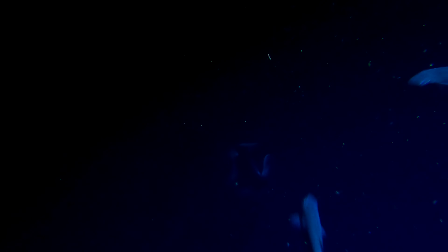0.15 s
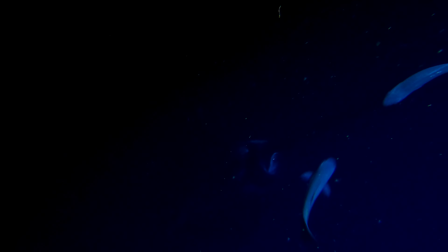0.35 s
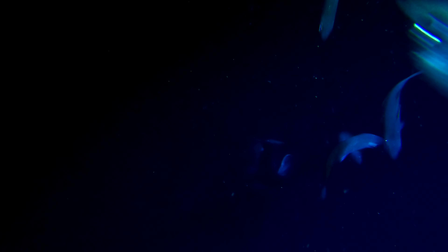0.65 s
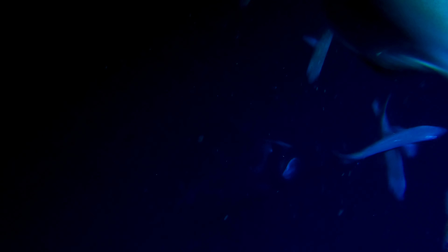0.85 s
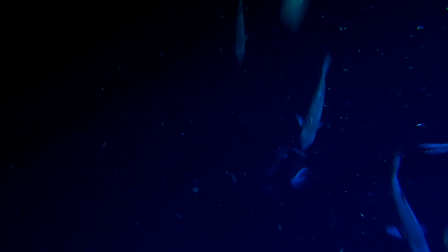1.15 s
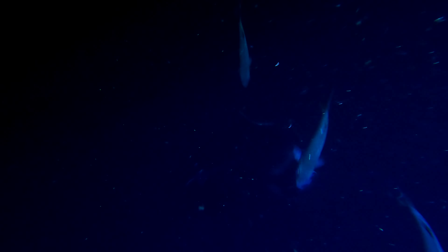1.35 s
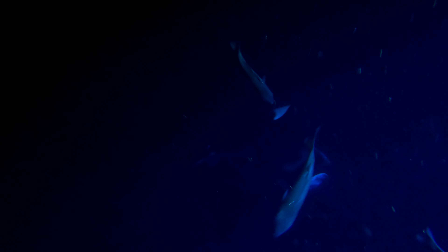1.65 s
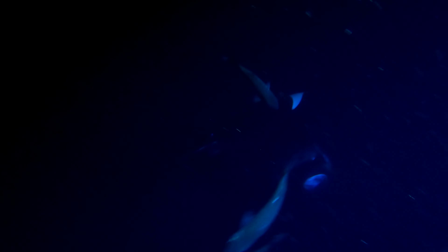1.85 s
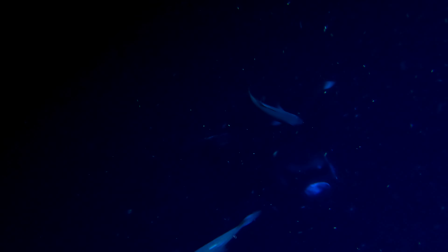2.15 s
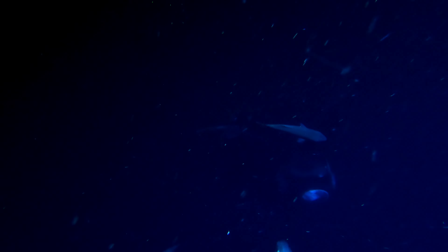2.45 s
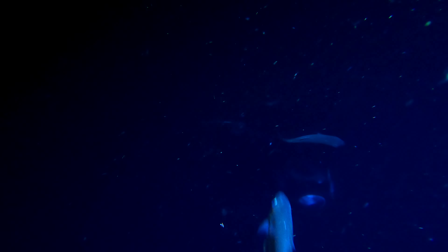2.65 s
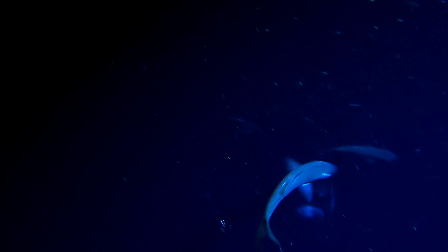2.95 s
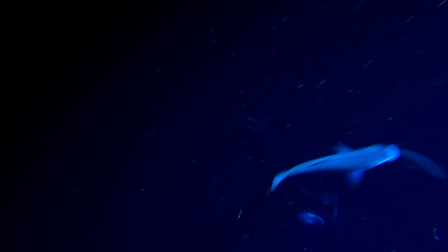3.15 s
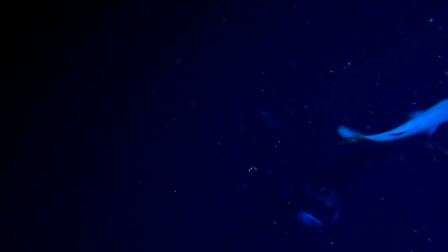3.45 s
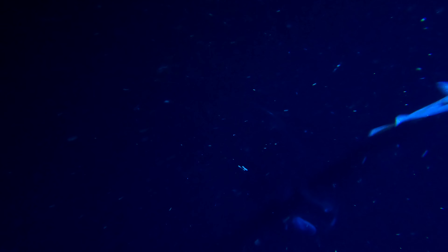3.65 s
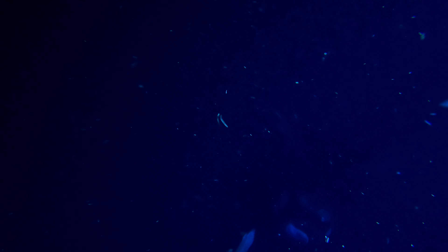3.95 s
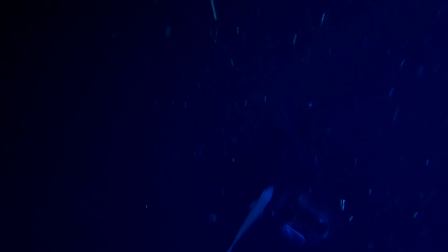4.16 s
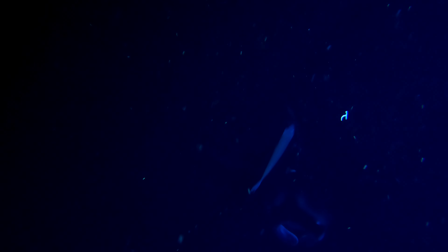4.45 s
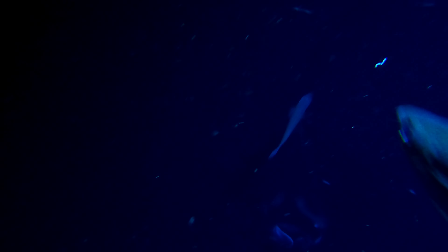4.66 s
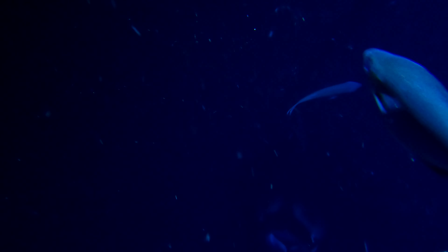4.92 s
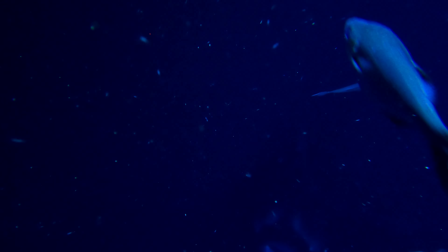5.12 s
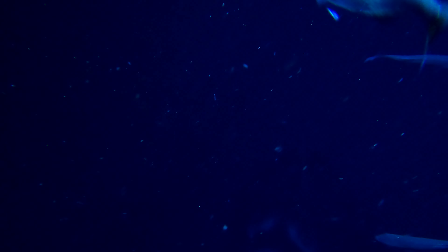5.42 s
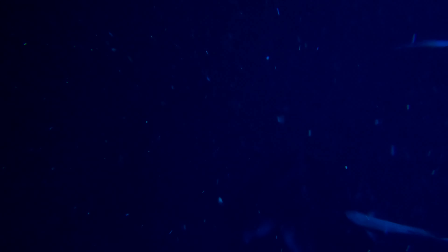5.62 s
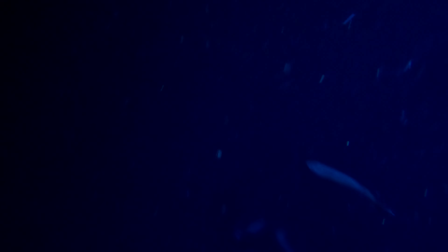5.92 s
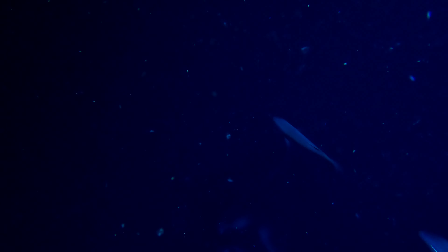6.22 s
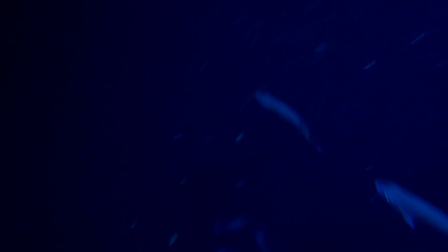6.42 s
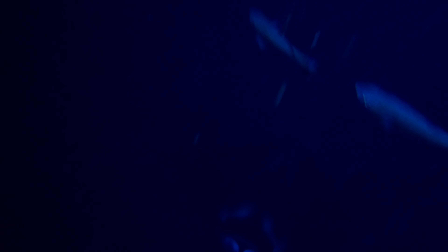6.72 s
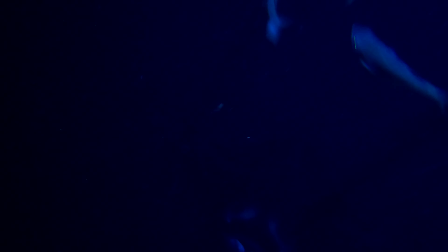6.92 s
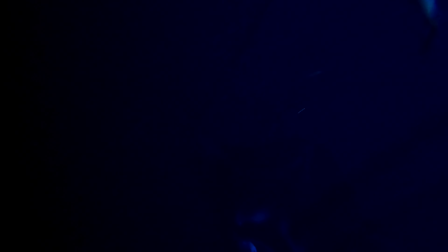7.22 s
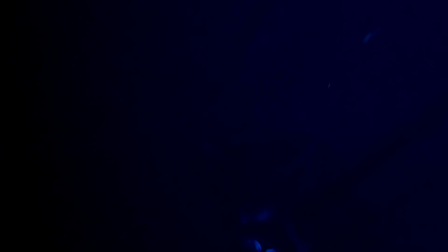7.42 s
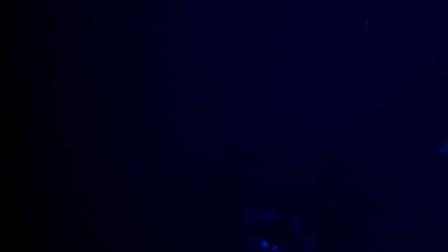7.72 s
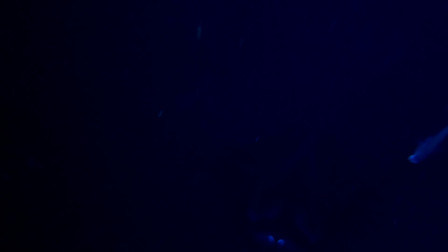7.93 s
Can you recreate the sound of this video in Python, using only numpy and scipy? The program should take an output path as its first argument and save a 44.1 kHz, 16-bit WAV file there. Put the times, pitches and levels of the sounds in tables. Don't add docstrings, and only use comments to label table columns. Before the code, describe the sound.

Muffled engine drone heard beneath the sea, with watery surges, dull knocks and tiny bubble ticks, opening from closed mono to clearer stereo after five seconds.

```python
import sys
import numpy as np
from scipy import signal
from scipy.fft import rfft, irfft, next_fast_len
from scipy.io import wavfile
from scipy.ndimage import uniform_filter1d, map_coordinates

SR = 44100
rng = np.random.default_rng(int(sys.argv[2]) if len(sys.argv) > 2 else 0)


def convert_level_to_amplitude(level_db):
    exponent = np.asarray(level_db, float) / 20
    return 10 ** exponent


def generate_wav(signal):
    frames = np.transpose(np.atleast_2d(signal))
    scaled = np.clip(frames, -1, 1) * 32767
    pcm = np.round(scaled).astype(np.int16)
    wavfile.write(sys.argv[1], SR, pcm)


N = 356328


def unit(x):
    return x / np.sqrt(np.mean(x ** 2) + 1e-20)


def along(points, hz):
    f, *cols = np.transpose(points)
    return [np.interp(np.log(hz + 1), np.log(f + 1), c) for c in cols]


def curves(rows):
    s, *cols = np.transpose(rows)
    return [np.interp(np.arange(N) / SR, s, c) for c in cols]


def wobble(rate):
    coarse = np.arange(0, N + 64, 64)
    knots = rng.standard_normal(int(N * rate / SR) + 4)
    smooth = map_coordinates(knots, [coarse * rate / SR])
    return np.interp(np.arange(N), coarse, smooth)


def filtered(x, response):
    m = next_fast_len(N + 8192)
    return irfft(rfft(x, m) * response(np.fft.rfftfreq(m, 1 / SR)), m)[..., :N]


def above(hz, edge_hz, order=6):
    return hz ** order / (hz ** order + edge_hz ** order)


def bell(hz, centre_hz, width_hz):
    return np.exp(-.5 * ((hz - centre_hz) / width_hz) ** 2)


def humps(modes, hz):
    return convert_level_to_amplitude(sum(db * bell(hz, centre, width) for centre, width, db in modes))


def evened(x, seconds):
    power = np.abs(uniform_filter1d(x ** 2, size=round(seconds * SR)))
    return x / np.sqrt(power + 1e-3 * np.mean(x ** 2))


def swells(rows, calm_db, edge_s):
    t = np.arange(0, N, 64) / SR
    start, length, db = np.transpose(rows)[:, :, None]
    shape = np.clip(np.minimum(t - start, start + length - t) / edge_s + 1, 0, 1)
    swell = np.sum(convert_level_to_amplitude(db) * shape ** 2, axis=0)
    return np.hypot(convert_level_to_amplitude(calm_db), np.interp(np.arange(N) / SR, t, swell))


def churn(patchy_db, strands_db=2.5):
    z = signal.stft(rng.standard_normal(N), nperseg=2048)[2]

    def blurred(bins, frames):
        across = uniform_filter1d(rng.standard_normal(z.shape), size=bins, axis=0)
        return unit(uniform_filter1d(across, size=frames, axis=1))
    gain = convert_level_to_amplitude(patchy_db * blurred(10, 3) + strands_db * blurred(2, 30))
    return unit(signal.istft(z * gain, nperseg=2048)[1][:N])


# (time [s], level [dB], frequency [Hz])
STRONGEST = [(2.55, -40, 159.8), (2.87, -22.5, 159.8), (3.2, -26.5, 159.8), (3.85, -27, 160.5),
             (4.06, -18.5, 162), (4.27, -26, 162.2), (4.42, -23, 162.2), (4.82, -26, 162.2),
             (4.97, -17, 162.8), (5.15, -25.5, 163), (5.45, -27.5, 163), (5.75, -22.5, 163),
             (6.0, -24.5, 163), (6.29, -19.5, 163), (6.65, -25.5, 163), (6.87, -24, 163), (7.1, -27.5, 163),
             (7.95, -20, 163)]
# (multiple of the cycle [-], level over the wash [dB], swing [dB], loudest time [s], period [s])
HUM = [(7, 8.5, 4.5, 5.8, 12), (8, 5.5, -0.6, 7, 12), (12, 6.5, 4.5, 5.3, 7.6), (14, 8.5, 8, 6.9, 12),
       (15, 4.5, 12, 5.25, 10), (16, 5, 2, 1.01, 9), (17, 9, 5.5, 0.77, 3.8)]


def hull_hum(turn):
    t = np.arange(N) / SR
    throb_db = 5.4 * np.sin(2 * np.pi * 4.1 * t + 0.45)
    main_db, main_hz = curves(STRONGEST)
    hum = convert_level_to_amplitude(main_db + 42) * np.sin(2 * np.pi * np.cumsum(main_hz) / SR)
    for order, db, swing_db, loudest_s, period_s in HUM:
        drift_db = swing_db * np.cos(2 * np.pi * (t - loudest_s) / period_s)
        level_db = db + drift_db + throb_db * (order == 7) + 2.0 * wobble(2.5)
        hum += convert_level_to_amplitude(level_db) * np.sin(order * turn + 7 * rng.random())
    return hum


# (multiple of the cycle [-], level over the wash [dB])
CLATTER = [(35, 4), (39, 9.5), (41, 8.5), (42, 8), (44, 10), (46, 13), (48, 7.5), (50, 12.5), (52, 2.5),
           (53, 8.5), (56, 8), (58, 7.5), (60, 4), (61, 2), (64, 5), (67, 11.5), (71, 10.5), (72, 4),
           (74, 10.5), (75, 11.5), (78, 8.5)]
# (time [s], level [dB])
LOAD = [
    (0, -3),
    (3, 0.5),
    (5, 0.5),
    (8.08, 0),
]


def clatter(turn):
    tones = sum(convert_level_to_amplitude(db + 3.0 + 0.87 * wobble(2.2)) * np.sin(order * turn + 7 * rng.random())
                for order, db in CLATTER)
    return convert_level_to_amplitude(curves(LOAD)[0]) * tones


def wash(turn):
    gate = unit(1 + .08 * np.cos(2 * turn) + .08 * np.cos(4 * turn))
    steady = filtered(churn(patchy_db=2.0), lambda hz: np.sqrt(1 - above(hz, 2200)))
    gated = filtered(gate * churn(patchy_db=2.0), lambda hz: np.sqrt(above(hz, 1800)))
    noise = steady + gated
    between_orders = filtered(noise, lambda hz: bell(hz, 165, 16) + 0.46 * bell(hz, 310, 50))
    settle_db = 0.5 - np.arange(N) / SR
    return noise + (convert_level_to_amplitude(settle_db) - 1) * between_orders


def engine():
    cycle_hz = 27.165
    turn = 2 * np.pi * (cycle_hz * np.arange(N) / SR + 0.00095 * wobble(3))
    tone_gain = np.sqrt(8 / SR)
    return wash(turn) + tone_gain * (hull_hum(turn) + clatter(turn))


# (start [s], length [s], level [dB])
GROANS = [(0.055, 0.24, -26), (0.315, 0.056, -26), (0.612, 0.036, -24.5), (0.895, 0.025, -25),
          (1.328, 0.026, -26.5), (1.464, 0.044, -22.5), (1.8, 0.062, -21), (2.926, 0.032, -29.5),
          (3.748, 0.068, -23.5), (3.96, 0.036, -21.5), (4.128, 0.21, -18.5), (4.631, 0.11, -23),
          (5.297, 0.034, -23.5), (5.778, 0.14, -24), (6.127, 0.037, -27.5)]


def groaning():
    calm_db = -28.5 - 0.38 * np.arange(N) / SR + 2.0 * wobble(6)
    return swells(GROANS, calm_db, edge_s=.06)


# (frequency [Hz], level per Hz [dB])
WASH_LOW = [(50, -42), (85, -14), (156, 0.5), (183, -3), (221, 1), (265, -15), (399, -15.5), (453, -10.5),
            (487, -11), (577, -8), (807, -15.5), (878, -22.5), (1050, -28), (1360, -58), (2310, -120)]
# (frequency [Hz], level per Hz [dB])
WASH_HIGH = [(950, 1.5), (1200, -7), (1500, -11), (1750, -18.5), (2050, -14), (2300, -19), (3000, -25),
             (3400, -32.5), (3650, -30.1), (4300, -38), (4550, -42), (4750, -43.1), (5250, -45.1),
             (5700, -45.5),
             (6501, -51), (7501, -55), (8101, -62), (8901, -61.5), (9301, -79), (14001, -89)]
# (time [s], level [dB])
MURK = [
    (0, -1),
    (.25, 0.8),
    (1.6, 0.14),
    (3.6, -.6),
    (4.0, 0),
    (4.4, -5),
    (4.7, -.6),
    (6, -1.7),
    (8.08, -1.96),
]


def sea():
    murk_db, = curves(MURK)
    raw = engine()

    def low(hz):
        return convert_level_to_amplitude(along(WASH_LOW, hz)[0])

    def high(hz):
        return convert_level_to_amplitude(along(WASH_HIGH, hz)[0])
    lower = filtered(raw, lambda hz: low(hz) * (1 - above(hz, 144.2, order=24)))
    upper = filtered(raw, lambda hz: low(hz) * above(hz, 149.6, order=24) * (1 - above(hz, 280.4, order=12)))
    body = filtered(raw, lambda hz: low(hz) * above(hz, 269, order=12) * (hz < 1000))
    treble = filtered(raw, lambda hz: high(hz) * (hz >= 1000))
    return (groaning() * unit(evened(lower, seconds=0.68))
            + convert_level_to_amplitude(-21.5) * unit(upper)
            + convert_level_to_amplitude(-23 + .6 * murk_db) * unit(evened(body, seconds=.3))
            + convert_level_to_amplitude(-42 + murk_db) * unit(treble))


# (frequency [Hz], level per Hz [dB])
PUSH = [(4.7, -37.5), (8.0, 2.5), (27, 4.5), (47, 3), (76, -8.5), (100, -11), (130, -31), (220, -120)]
# (start [s], length [s], level [dB])
SURGES = [(0.223, 0.09, -25.5), (0.556, 0.036, -18.5), (0.993, 0.046, -21.5), (1.466, 0.032, -20),
          (1.609, 0.193, -20), (1.863, 0.108, -23.5), (2.056, 0.094, -21), (2.753, 0.21, -23),
          (4.094, 0.156, -21.5), (5.293, 0.22, -22), (5.558, 0.032, -25), (6.458, 0.28, -21),
          (7.111, 0.11, -20.5), (7.448, 0.134, -28), (7.765, 0.044, -20.5)]


def surges():
    push = filtered(churn(patchy_db=4.0), lambda hz: convert_level_to_amplitude(along(PUSH, hz)[0]))
    gain = swells(SURGES, calm_db=-28 + 1.5 * wobble(8.9), edge_s=.05)
    return gain * convert_level_to_amplitude(-0.93) * unit(evened(push, seconds=0.12))


# (time [s], peak level [dB], frequency [Hz], 60 dB decay time [s])
BUMPS = [(0.608, -16.5, 270, 0.086), (.842, -6.5, 305, 0.03), (.881, -9, 333, 0.039),
         (3.215, -9, 187, 0.036), (3.296, -10, 250, .04), (3.314, -4.5, 310, .03),
         (3.365, -11.5, 202, 0.061), (3.478, -5, 299, 0.037), (4.158, -13.5, 143, 0.22),
         (4.24, -13.5, 120, 0.12), (5.289, -7, 170, .06), (5.306, -1, 75, 0.04), (5.39, -11, 29.7, .15),
         (4.085, -10, 623, 0.072), (5.283, -37.5, 1288, 0.041), (5.285, -11, 764, 0.032),
         (5.68, -24, 700, .25), (6.33, -14, 562, 0.09), (6.7, -40, 1153, 0.022), (7.17, -16, 190.4, .4),
         (2.2, -18.5, 214, .15)]


def bumps():
    out, t = np.zeros(N + SR), np.arange(SR // 4) / SR
    for s, db, hz, t60 in BUMPS:
        contact = 1 - np.exp(-t / 0.005)
        ring = np.sin(2 * np.pi * hz * t)
        out[round(s * SR):][:len(t)] += convert_level_to_amplitude(db + 7 - 60 * t / t60) * contact * ring
    return out[:N]


# (time [s], peak level [dB])
TICKS = [(1.1263, -65), (1.283, -51), (1.4, -53), (4.6194, -59), (5.0958, -58), (5.2032, -51),
         (5.3078, -62), (5.4036, -51), (5.673, -58), (5.7199, -57), (6.0396, -42.5), (6.135, -53.5),
         (6.2931, -52), (6.6603, -55), (6.8745, -45), (7.0097, -48.5), (7.1053, -50), (7.4212, -50.5),
         (7.647, -54), (7.7987, -51), (7.9857, -46.5)]


def ticks():
    out, t = np.zeros(N + SR), np.arange(SR // 4) / SR
    for s, db in TICKS:
        out[round(s * SR):][:len(t)] += convert_level_to_amplitude(db + 3.5 - 60 * t / .007) * rng.standard_normal(len(t))
    snaps = filtered(out[:N], lambda hz: above(hz, 3490) * (1 - .99 * above(hz, 7600, order=14)))
    drained = np.arange(N) > 4.8 * SR
    return snaps * convert_level_to_amplitude([[3], [-5]]) ** drained


# (frequency [Hz], width [Hz], level [dB])
CASE = [(1265, 41, -3), (1425, 44, 4.5), (1494, 45, -4), (1631, 67, 5), (2311, 160, -1.7), (3301, 57, 1.5),
        (3321, 61, -1.1), (3561, 83, 3), (4351, 101, 2), (4521, 61, -4), (4801, 141, 3.5),
        (5071, 121, -2.5), (5601, 201, 2.5), (6401, 201, -2)]


def case_wall(water):
    return filtered(water, lambda hz: humps(CASE, hz))


# (lag [s], rise [s], level once open [dB], creep [dB/s], step at the bubble [dB])
CLEARING = [
    (.12, .35, -18, 5.5, 9),
    (0.005, 0.25, -6, 3.5, 3),
    (0.079, 0.22, -4.5, 4, -5),
    (0.02, .17, -12.5, 5, 3.5),
    (0.05, 0.26, -14, 6.5, 2),
]


def clearing():
    open_s, pop_s, pop_lasts_s = 4.66, 6.8, .28
    t = np.arange(N) / SR
    step = np.clip((t - pop_s) / pop_lasts_s, 0, 1)
    gains = []
    for lag_s, rise_s, db, creep_db, step_db in CLEARING:
        rise = (1 - np.exp(-np.maximum(t - open_s - lag_s, 0) / rise_s)) ** 2
        gains.append(rise * convert_level_to_amplitude(db + creep_db * (np.minimum(t, pop_s) - open_s) + step_db * step))
    return gains


# (frequency [Hz], left level [dB], left phase [rad],
# right level [dB], right phase [rad])
PORTS = [(40, -33, 3.1, -10.5, 3.8), (170, -24, 3.1, -14.5, 4.1), (430, -11, 2, -11.5, 3.82),
         (603, -1.5, 5.7, 5, 4.27), (700, -5, 1.1, 9, 5.22), (950, 1, 3.4, 5, 3.78),
         (1015, 4, 2.1, 10, 3.76), (1020, 6.5, 2.72, 11.5, 4.25), (1230, 18.5, 1.6, 19, 3.19),
         (1510, 12, 2, 10, 2.9), (1590, 15, 1.7, 15, 3), (2190, 12, .1, 9.5, 1.7), (2470, 8, .1, 5, 1.4),
         (3061, 15, 1.1, 13, 2.48), (3371, 11.1, 0.56, 8.5, 2.01), (3771, 15.1, .31, 7.1, 1.71),
              (4101, 18.7, .11, 3, 1.11), (4501, 22.4, .11, 9.5, 1.61), (5001, 19.1, .11, 9.6, 0.96),
              (5301, 16.1, .11, 8, .41), (5601, 7.7, .11, 0.6, .11), (6901, 23.5, .11, 2, .11),
              (9001, 18.1, .11, -9.5, .11), (10001, 3.1, .11, -7, .11)]
# (frequency [Hz], width [Hz], level [dB])
CAVITY = [(560, 43, -3), (1360, 73, 3.5), (1626, 100, 5), (2191, 66, 5), (2301, 111, -1), (2781, 61, -4),
          (2911, 61, 2.5), (4401, 221, 3.5), (4761, 51, -1)]


def ports(water):
    lowest, low, middle, high, highest = clearing()
    deep = filtered(water, lambda hz: 1 - above(hz, 450, order=8))
    rest = filtered(water, lambda hz: above(hz, 980, order=10))
    top = filtered(water, lambda hz: above(hz, 1370, order=20))
    air = filtered(water, lambda hz: above(hz, 3300, order=10))
    opened = lowest * deep + low * (water - rest - deep) + middle * (rest - top) + high * (top - air) + highest * air

    def pair(hz):
        left_db, left_rad, right_db, right_rad = along(PORTS, hz)
        left = convert_level_to_amplitude(left_db) * np.exp(1j * left_rad)
        right = convert_level_to_amplitude(right_db) * np.exp(1j * right_rad)
        return humps(CAVITY, hz) * np.array([left, right])
    return filtered(opened, pair) * convert_level_to_amplitude(0.51 * wobble(9))


def bubble_scatter(opened):
    trembling = opened * [wobble(150), wobble(150)]
    return filtered(trembling, lambda hz: convert_level_to_amplitude(-23.5 + 14 * above(hz, 3500) - 12 * above(hz, 6200)))


def scene():
    fade_out = np.clip(np.arange(N)[::-1] / 300, 0, 1)
    water = (sea() + surges() + bumps()) * fade_out
    opened = ports(water)
    return case_wall(water) + ticks() + opened + bubble_scatter(opened)


def band_limit(x):
    return signal.sosfilt(signal.butter(12, 14100, fs=SR, output="sos"), x)


def record(dry):
    hiss = convert_level_to_amplitude(-120) * rng.standard_normal(N)
    return band_limit(dry + hiss)


dry = scene()
out = record(dry)
generate_wav(out)
```